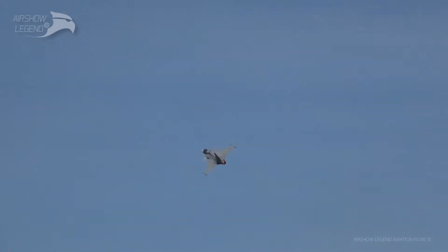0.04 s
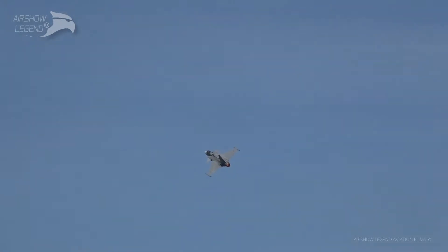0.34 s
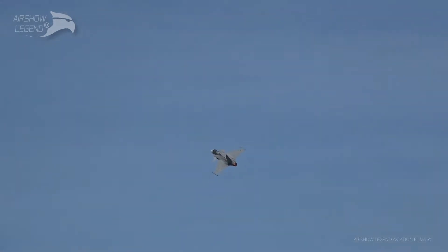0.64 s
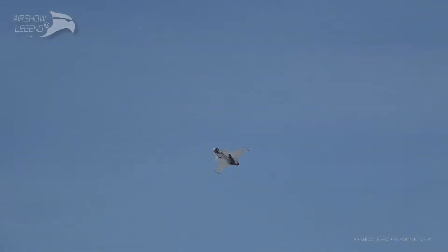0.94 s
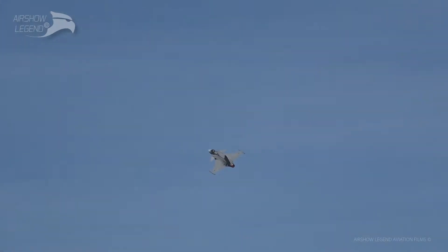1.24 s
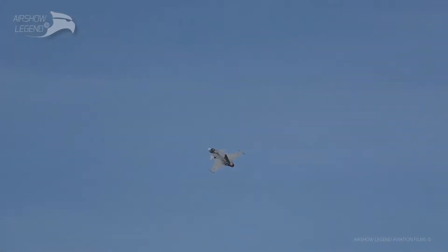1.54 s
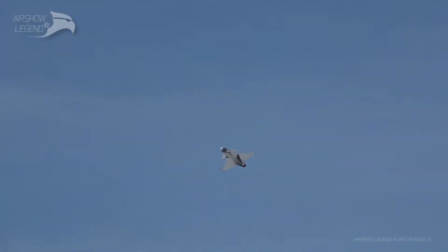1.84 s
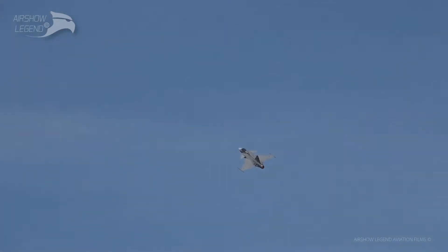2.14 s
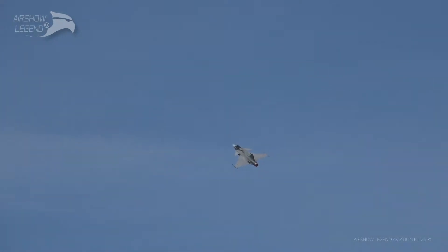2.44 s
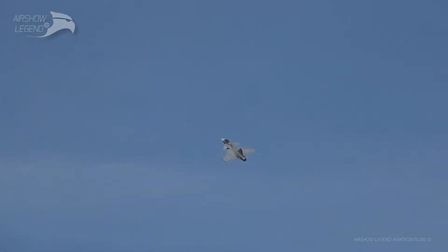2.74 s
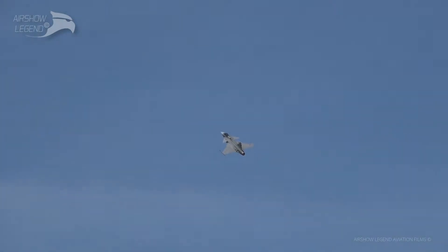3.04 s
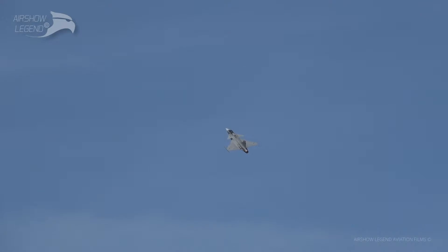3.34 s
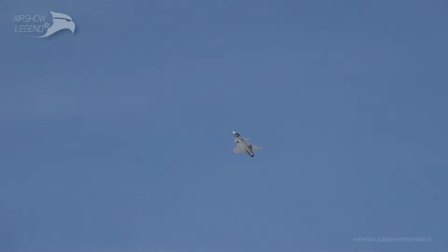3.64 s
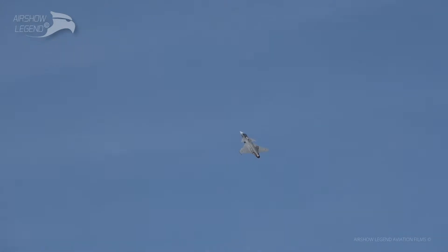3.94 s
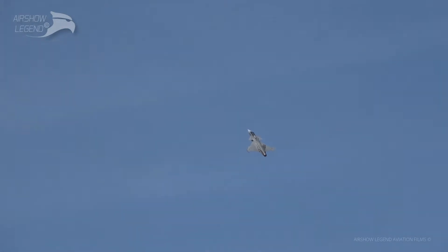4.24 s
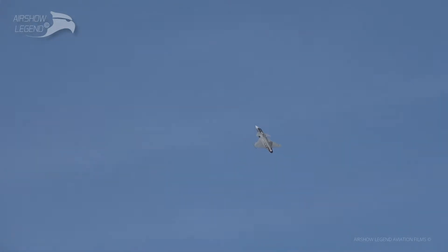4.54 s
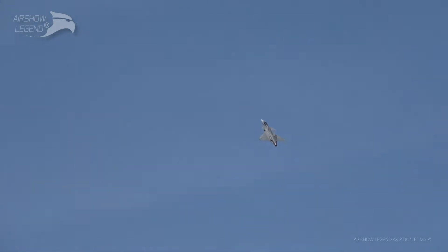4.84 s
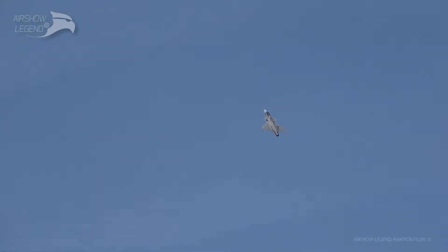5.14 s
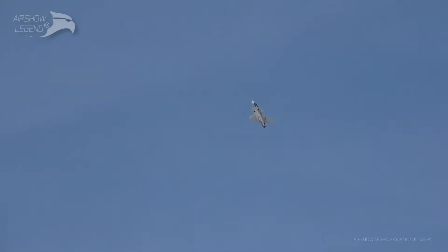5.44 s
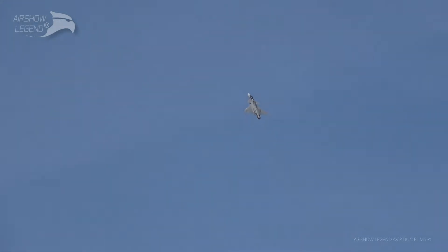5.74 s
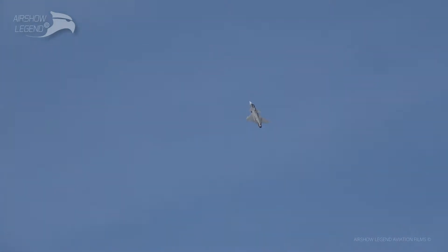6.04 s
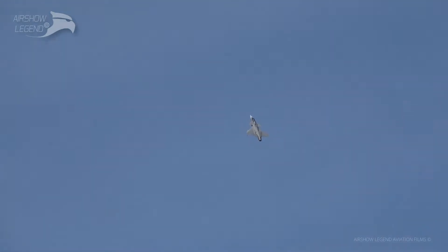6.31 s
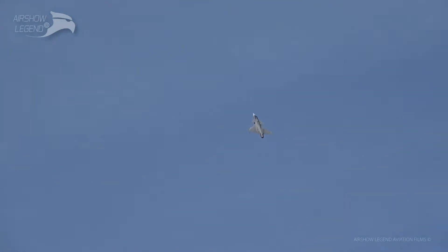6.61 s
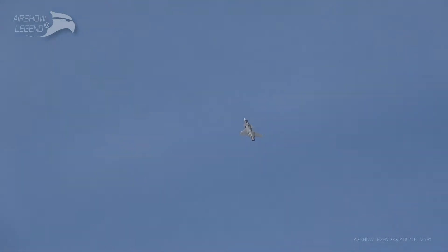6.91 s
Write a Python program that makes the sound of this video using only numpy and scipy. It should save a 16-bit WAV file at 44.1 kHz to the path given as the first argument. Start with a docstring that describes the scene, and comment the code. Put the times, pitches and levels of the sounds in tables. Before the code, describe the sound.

A fighter jet climbs away on afterburner high above an airfield, heard from the ground. From the start there is a continuous, wavering roar with a deep rumble, a hollow howl and a rough hiss. It grows gradually, with light crackle around 1.5 seconds and a sharp crack near 2 seconds. From about 2.7 to 4 seconds the roar is loud and broken by bouts of hard, ripping crackle. Between 4 and 5.2 seconds it sinks to a quieter, duller roar. Scattered cracks return from about 5.3 seconds as the howl swells again. From 6.3 seconds the roar surges unevenly and the crackling thickens, loudest around 7 seconds, where the strongest cracks slightly overload the microphone. The tone drifts slowly lower through the second half, and the jet is still roaring at the end.

```python
"""An airfield, one microphone on the ground; high overhead a fighter jet climbs away on afterburner.
Its exhaust plume rumbles, roars and hisses, swelling in the moving air, and an echo off the ground
colours the roar with slowly sinking peaks. Shock fronts from the plume crackle, more and more as the
nozzle turns to the microphone, and the tallest overload the recorder."""
import sys
import numpy as np
from scipy import signal
from scipy.fft import rfft, irfft, next_fast_len
from scipy.io import wavfile
from scipy.ndimage import uniform_filter1d, minimum_filter1d, map_coordinates

SR = 44100
rng = np.random.default_rng(int(sys.argv[2]) if len(sys.argv) > 2 else 0)


def put_to_file(sound):
    """Save the sound as 16-bit audio at rate SR, in the file named by the first command-line argument."""
    columns = np.atleast_2d(sound).T  # one column per channel
    safe = np.clip(columns, -1, 1)
    whole_steps = np.round(safe * 32767)
    wavfile.write(sys.argv[1], SR, whole_steps.astype(np.int16))


N = 316197
TIME = np.arange(N) / SR

# spectra of the plume's four bands and of one shock front: frequency_hz, density_db
RUMBLE_SPECTRUM = [(10, -27.5), (25, -11.5), (48, -7.5), (66, 0), (82, -1.5), (105, -7.5), (150, -28.5)]
ROAR_SPECTRUM = [(90, -35.5), (118, -9.5), (145, 2), (200, 0.5), (260, 1), (310, -10), (420, -28.5)]
RASP_SPECTRUM = [(280, -22), (450, -2.5), (560, -1), (660, -1.5), (900, -2.5), (1250, -4.5), (1650, -6),
                 (2000, -11.5), (2500, -19.5), (3300, -28.5), (5000, -58)]
HISS_SPECTRUM = [(1400, -23), (2200, -3.5), (2900, -1.5), (3500, -6), (4300, -9), (5000, -20),
                 (5900, -24.5), (6700, -42), (8000, -53.5), (15000, -69)]
FRONT_SPECTRUM = [(30, -16), (150, -2.5), (400, -6.5), (800, -3.5), (1600, -3), (2400, -12), (4300, -21),
                  (5200, -28.5), (6300, -35.5), (8000, -52), (11000, -76)]
# rise and fall of the plume's bands, each before its trim: time_s, level_db
RUMBLE_CURVE = [(0.0, -34), (0.54, -37.5), (1.65, -24.5), (1.98, -30), (2.79, -24), (3.3, -26.5),
                (3.7, -34.5), (4.41, -35.5), (6.43, -32), (6.61, -41), (7.17, -49)]
ROAR_CURVE = [(0.0, -19), (0.22, -17), (0.5, -22.5), (0.72, -17), (1.52, -16.5), (2.04, -20.5),
              (2.54, -13.5), (2.62, -20.5), (2.659, -11.5), (3.95, -12.5), (4.83, -27.5), (5.329, -19.5),
              (6.21, -23), (6.47, -10), (6.53, -16), (6.67, -9), (6.81, -18.5), (7.03, -10.5),
              (7.07, -18.5), (7.17, -8)]
HOWL_CURVE = [(0.0, -21.5), (0.08, -29), (1.06, -22.5), (1.16, -18), (1.64, -22.5), (1.96, -17),
              (2.62, -18.5), (2.76, -16.5), (2.95, -13.5), (3.18, -21.5), (3.25, -12.5), (3.89, -13.5),
              (4.05, -18.5), (4.25, -26), (4.55, -25), (5.11, -33.5), (5.41, -22), (5.53, -25), (5.85, -18),
              (6.0, -21), (6.11, -28), (6.2, -23.5), (6.29, -18), (6.53, -19), (6.8, -17.5), (7.11, -16),
              (7.17, -17)]
HISS_CURVE = [(0.03, -43), (0.74, -38.5), (0.86, -36.5), (1.06, -37), (1.5, -34.5), (2.02, -34),
              (2.39, -37.5), (2.58, -35), (2.72, -31.5), (3.21, -34), (3.26, -36.5), (3.67, -40.5),
              (3.85, -39), (4.25, -45), (4.84, -48), (5.23, -46), (5.39, -43), (5.511, -44), (5.77, -39.5),
              (6.13, -42.5), (6.3, -39.5), (6.49, -36), (6.69, -40), (6.76, -36.5), (7.17, -36)]
# where the large eddies peak, the howl about an octave above the roar: time_s, roar_hz, howl_hz
EDDY_PEAKS = [(0.0, 180, 405.6), (0.6, 195.2, 432), (1.06, 210.1, 416), (1.7, 202.1, 415),
              (1.98, 221.9, 442.1), (2.45, 227.7, 423), (2.9, 204.5, 384), (3.3, 215, 415.1),
              (3.65, 205, 402), (3.9, 205.1, 382.7), (4.08, 200, 350), (4.5, 200.5, 411),
              (5.31, 199.8, 398.6), (5.85, 206.1, 399.3), (6.3, 195, 383.4), (6.55, 192, 325.3),
              (6.85, 205, 351.7), (7.17, 190, 353)]
# narrow bands of the roar that briefly swell and fade: peak_s, spread_s, centre_hz, width_hz, level_db
ROAR_SWELLS = [(0.87, 0.36, 710, 200, -29.5), (1.65, 0.21, 169.9, 50, -21.5), (2.15, 0.22, 530, 90, -26),
               (1.85, 0.033, 442, 45, -17.5), (2.348, 0.29, 280, 45, -21), (2.422, 0.12, 425, 45, -19.5),
               (3.06, 0.025, 1630, 345, -18.5), (3.4, 0.083, 560, 70, -18.5), (3.9, 0.11, 615, 47, -26.5),
               (3.6, 0.061, 950, 70, -25), (4.08, 0.069, 950, 160, -26.5), (4.25, 0.14, 1300, 230, -36.5),
               (5.6, 0.16, 535, 101.4, -20.5), (6.4, 0.029, 385, 91, -16), (6.47, 0.045, 530, 90, -20.5),
               (6.55, 0.13, 690, 90, -26.5), (7.048, 0.13, 1230, 450, -22), (7.057, 0.12, 640, 54, -22),
               (7.05, 0.12, 350, 51, -19.5), (4.3, 0.13, 760, 160, -32)]
# bouts of crackle: peak_s, spread_s, above_hiss_curve_db
CRACKLE_BOUTS = [(1.501, 0.43, 1.5), (2.74, 0.085, 5), (3.08, 0.18, 8), (3.6, 0.083, 1.5), (3.86, 0.08, 8),
                 (5.389, 0.075, 3), (5.848, 0.19, 0), (6.471, 0.2, 6.5), (7.03, 0.15, 9)]
# the strongest shocks, and at 6.9264 s and 6.949 s the overloading ground echoes of the two just before them,
# all before the air dulls them, 0 dB at full scale: time_s, front_db, whole_crest_db
STRONG_SHOCKS = [(1.9504, -7.0, -7.0), (2.6859, -7.5, -4.5), (2.7379, -16, 1.1), (2.801, -15, 0.1),
                 (2.9123, -8, -5.5), (2.9251, -19.5, 0.2), (3.0037, -9.5, -4.5), (3.0458, -7.0, -5.5),
                 (3.078, -6.5, -4.5), (3.1437, -6.5, -2.5), (3.1494, -8.5, -6.0), (3.196, -14.5, -9.5),
                 (3.2082, -10.5, -8.0), (3.229, -9, -5), (3.2834, -8.5, -1.5), (3.3021, -10, -1.5),
                 (3.471, -19, 0.1), (3.5922, -24.0, 0.2), (3.6436, -19, 0.4), (3.73, -12.5, -7.0),
                 (3.7639, -9, 0.4), (3.8029, -11, -2.5), (3.8276, -15, -4.0), (3.8344, -11.5, -9.5),
                 (3.8488, -7.5, -1.5), (3.8911, -11, -2.5), (3.9705, -12, -8), (3.9751, -9, -5.0),
                 (5.2839, -20.0, -12.0), (5.3936, -18.5, -9.5), (5.4266, -15.5, -15.5),
                 (5.4403, -17.0, -15.5), (5.5842, -12, -8.5), (5.6483, -13.5, -4.5), (5.778, -12.0, -6.0),
                 (5.7968, -14.0, -7.5), (5.8362, -14.0, -8.5), (5.9642, -16.5, -6.0), (6.028, -16.0, -16.0),
                 (6.3094, -4.5, -3.5), (6.3135, -9.5, -2.5), (6.346, -10.0, -10.0), (6.3936, -10.0, -10.0),
                 (6.449, -17.0, -4.5), (6.488, -9.0, -2.5), (6.5031, -13.5, -5.0), (6.5186, -14.0, -7.0),
                 (6.582, -14.0, -9.0), (6.6134, -7.5, -1.5), (6.6287, -9.0, -3.0), (6.7455, -9, -4.5),
                 (6.816, -6.5, -2.5), (6.8788, -2.5, -2.5), (6.885, -10, -4), (6.9002, -8.5, -4.0),
                 (6.9204, -13.5, 1.5), (6.9264, -9.0, 1.5), (6.9425, -11.5, 1.2), (6.949, -9.5, 1.1),
                 (6.9626, -3.0, -1.5), (6.9802, -8.0, -1.5), (6.9864, -17.5, 0.6), (7.0156, -6.0, -1.5),
                 (7.028, -5.5, 1.8), (7.0567, -8.0, 1.8), (7.0668, -4.5, 1.4), (7.0941, -4.0, 1.5),
                 (7.131, -5.0, 1.5), (7.1549, -11.5, -1.5), (7.161, -8.5, -3)]
# a very faint, steady high hiss: frequency_hz, density_db
FAINT_HISS = [(1000, 0), (7500, 0), (11000, -5), (16000, -9.5)]


def amp(db):
    """Decibels to gain."""
    return 10 ** (np.asarray(db) / 20)


def unit(x):
    """x at rms 1."""
    return x / np.sqrt(np.mean(x ** 2) + 1e-20)


def gain(spectrum, hz):
    """Gain of a spectrum's points joined on a log axis."""
    points_hz, db = np.transpose(spectrum)
    return amp(np.interp(np.log(hz + 1), np.log(points_hz + 1), db, right=-120))


def curves(rows):
    """One value per sample for each column after the time."""
    time_s, *columns = np.transpose(rows)
    return [np.interp(TIME, time_s, column) for column in columns]


def climbing(start, end):
    """One value per sample, moving evenly over the climb."""
    return np.linspace(start, end, N)


def flare(peak_s, spread_s):
    """A bell-shaped rise and fall."""
    return np.exp(-((TIME - peak_s) / spread_s) ** 2 / 2)


def wobble(rate):
    """A smooth random curve, rate knots a second."""
    return map_coordinates(rng.standard_normal(int(N * rate / SR) + 4), [TIME * rate])


def filtered(x, response):
    """x times a response of frequency."""
    size = next_fast_len(N + SR // 4)
    return irfft(rfft(x, size) * response(np.fft.rfftfreq(size, 1 / SR)), size)[:N]


def lowpass(x, edge_hz, order=4):
    """x rolled off smoothly, halved at edge_hz."""
    return filtered(x, lambda hz: 1 / (1 + (hz / edge_hz) ** order))


def steady(x, seconds=0.11):
    """x held near rms 1 over every short stretch."""
    power = uniform_filter1d(x ** 2, size=int(seconds * SR))
    power = uniform_filter1d(power, size=int(seconds * SR / 2))
    return x / np.sqrt(np.abs(power) + 1e-12)


def noise_band(centre_hz, width_hz):
    """A band of noise of rms 1 around a centre that may move."""
    a, b = (lowpass(rng.standard_normal(N), width_hz / 2) for _ in range(2))
    phase = 2 * np.pi * np.cumsum(centre_hz * np.ones(N)) / SR
    return unit(a * np.cos(phase) + b * np.sin(phase))


def distant(x, edge_hz):
    """The farther the jet from the microphone, the more treble the air absorbs; it starts a bit bright."""
    treble = x - lowpass(x, edge_hz, order=6)
    return x - climbing(-0.11, 0.55) * treble


def worn(x, ceiling_db=-3, size=96):
    """The long way down wears the tallest crests smoothly to a ceiling."""
    needed = 1 / np.maximum(np.abs(x) / amp(ceiling_db), 1)
    held = minimum_filter1d(needed, size=2 * size)
    return x * uniform_filter1d(uniform_filter1d(held, size=size), size=size)


def ground_echo(x, blur_hz, shortest_at_s=2.41):
    """The bounce to the microphone, stronger as the jet climbs; rough ground scatters the treble away."""
    delay_ms = 4.598 + 0.33 * np.abs(TIME - shortest_at_s)
    delayed = map_coordinates(lowpass(x, blur_hz), [(TIME - delay_ms / 1000) * SR], order=1)
    return climbing(0.069, 0.52) * delayed


def grounded(x, blur_hz=845):
    """Direct sound plus its ground echo, at rms 1."""
    return unit(x + ground_echo(x, blur_hz))


def eddies(spectrum, patchy_db):
    """Turbulent noise of rms 1; the air on the way lifts and sinks patches of its spectrum."""
    cells = signal.stft(rng.standard_normal(N), nperseg=1024)[2]
    patches = uniform_filter1d(rng.standard_normal(cells.shape), size=8, axis=0)
    patches = uniform_filter1d(patches, size=10, axis=1)
    patchy = signal.istft(cells * amp(patchy_db * unit(patches)), nperseg=1024)[1][:N]
    return unit(filtered(patchy, lambda hz: gain(spectrum, hz)))


def swells():
    """Narrow bands of the roar briefly swell and fade."""
    return sum(amp(db) * flare(peak_s, spread_s) * noise_band(centre_hz, width_hz)
               for peak_s, spread_s, centre_hz, width_hz, db in ROAR_SWELLS)


def plume(rumble_trim_db=-2, roar_trim_db=-0.6, howl_trim_db=-0.1, hiss_trim_db=-2.5):
    """Mixing noise: large eddies rumble, roar and howl, small ones near the nozzle rasp and hiss."""
    rumble_db, roar_db, howl_db, hiss_db = (
        curves(rows)[0] for rows in (RUMBLE_CURVE, ROAR_CURVE, HOWL_CURVE, HISS_CURVE))
    howl_swing_db, hiss_swing_db = howl_db - howl_db.mean(), hiss_db - hiss_db.mean()
    roar_hz, howl_hz = curves(EDDY_PEAKS)
    puffs = wobble(70)  # the small eddies come in puffs
    rumble = amp(rumble_db + rumble_trim_db) * steady(eddies(RUMBLE_SPECTRUM, patchy_db=3), seconds=0.17)
    # roar and howl are each a broad band with a narrow core
    roar = grounded(eddies(ROAR_SPECTRUM, patchy_db=0)) + 0.67 * noise_band(roar_hz, width_hz=50.4)
    roar = amp(roar_db + roar_trim_db) * steady(roar)
    core_gain = 0.69 * amp(0.3 * howl_swing_db)  # the core stands out as the howl grows
    howl = grounded(noise_band(howl_hz, width_hz=287)) + core_gain * noise_band(howl_hz, width_hz=60)
    howl = amp(howl_db + howl_trim_db) * steady(howl)
    rasp_db = -23.5 + 0.14 * howl_swing_db + 0.59 * hiss_swing_db + 0.37 * puffs
    rasp = amp(rasp_db) * grounded(eddies(RASP_SPECTRUM, patchy_db=1.5))
    hiss = distant(eddies(HISS_SPECTRUM, patchy_db=1.7), edge_hz=3800)
    hiss *= amp(hiss_db + hiss_trim_db + 0.74 * puffs)
    return rumble + roar + howl + rasp + hiss


def shock_shape(size=2048):
    """One shock of peak 1: a sudden rise of pressure, rounded by the air, and a slower fall."""
    cepstrum = irfft(np.log(gain(FRONT_SPECTRUM, np.fft.rfftfreq(size, 1 / SR))))
    cepstrum[1:size // 2] *= 2  # minimum phase puts the energy at the front
    cepstrum[size // 2:] = 0
    shape = irfft(np.exp(rfft(cepstrum)))
    return shape / shape.max()


def crackle(spread_db=7, clump_db=6, lull_db=-12):
    """Weak shocks of uneven size arrive at random, in clumps and bouts, sparser as the jet climbs."""
    hiss_db, = curves(HISS_CURVE)
    bouts = [amp(db) * flare(peak_s, spread_s) for peak_s, spread_s, db in CRACKLE_BOUTS]
    strength = np.maximum(np.max(bouts, axis=0), amp(lull_db))
    shocks_per_s = climbing(2400, 180)
    arrives = rng.random(N) < shocks_per_s / SR
    size_db = np.minimum(spread_db * rng.standard_normal(N), 8)
    size_db += clump_db * np.minimum(wobble(55), 1)
    train = signal.fftconvolve(arrives * amp(size_db) / np.sqrt(shocks_per_s), shock_shape())[:N]
    return amp(hiss_db) * strength * grounded(train, blur_hz=6000)


def cracks(gap_s=0.0011, hump_hz=380, count=3):
    """Strong shocks on humps of pressure, and the weaker fronts that the air splits off behind them."""
    fronts, splinters, humps = np.zeros((3, N + SR))
    shape = shock_shape()
    loss_db = climbing(3.5, 11)  # from one splinter to the next
    gaps_s = gap_s * rng.uniform(0.5, 1.5, (len(STRONG_SHOCKS), count))
    for (time_s, front_db, crest_db), spacing_s in zip(STRONG_SHOCKS, gaps_s):
        crest = round(time_s * SR)
        start = crest - shape.argmax()
        fronts[start] = amp(front_db)
        humps[crest] = max(amp(crest_db) - amp(front_db), 0)
        behind = start + (np.cumsum(spacing_s) * SR).astype(int)
        splinters[behind] += amp(front_db - loss_db[crest] * np.arange(1, count + 1))
    u = (np.pi * hump_hz * np.arange(-256, 257) / SR) ** 2
    hump_shape = (1 - 2 * u) * np.exp(-u)  # a crest between two troughs
    strong = signal.fftconvolve(fronts, shape)[:N] + signal.fftconvolve(humps, hump_shape, "same")[:N]
    return strong, signal.fftconvolve(splinters, shape)[:N]


def scene(shock_half_width_s=0.0007):
    """The jet from far below: for an instant each strong shock is all that arrives, then its echo."""
    to_shock_s = np.min([np.abs(TIME - time_s) for time_s, *_ in STRONG_SHOCKS], axis=0)
    between_shocks = 1 - np.exp(-(to_shock_s / shock_half_width_s) ** 2)
    strong, splinters, weak = (distant(fronts, edge_hz=5000) for fronts in (*cracks(), crackle()))
    shock_echo = ground_echo(strong + splinters, blur_hz=6500)
    roar = worn(plume() + swells() + weak + splinters + shock_echo)
    return (between_shocks * roar + strong)[None]


def record(dry, hiss_db=-90, soft_top_hz=15500, limit_hz=15950):
    """A very faint, steady high hiss lies beneath; the recorder clips, softens and limits the top."""
    hiss = amp(hiss_db) * unit(filtered(rng.standard_normal(N), lambda hz: gain(FAINT_HISS, hz)))
    clipped = np.clip(dry[0] + hiss, -1, 1)
    softened = lowpass(clipped, soft_top_hz, order=6)
    return filtered(softened, lambda hz: np.clip((limit_hz - hz) / 500, 0, 1))[None]


dry = scene()
out = record(dry)
put_to_file(out)
```